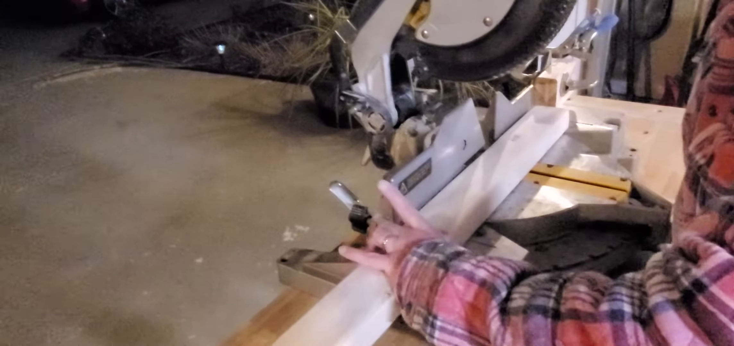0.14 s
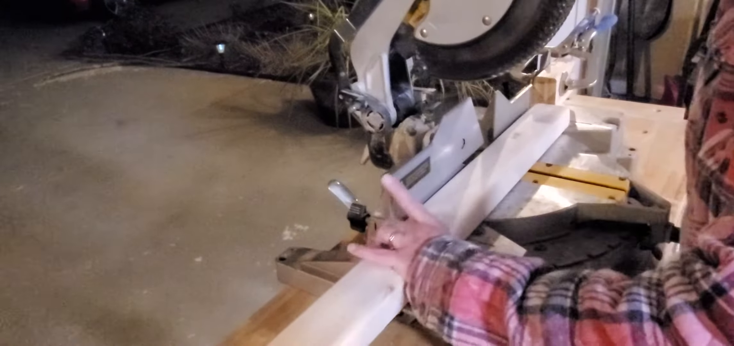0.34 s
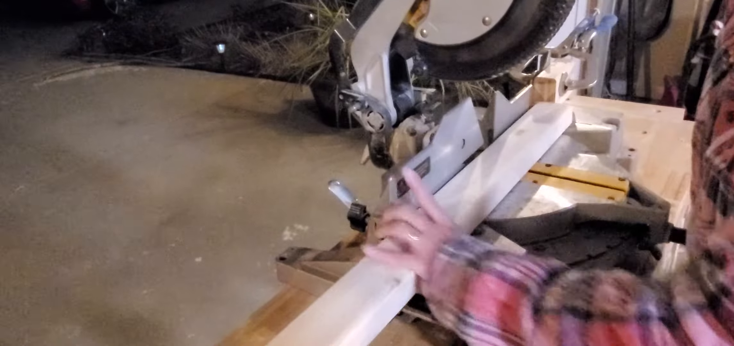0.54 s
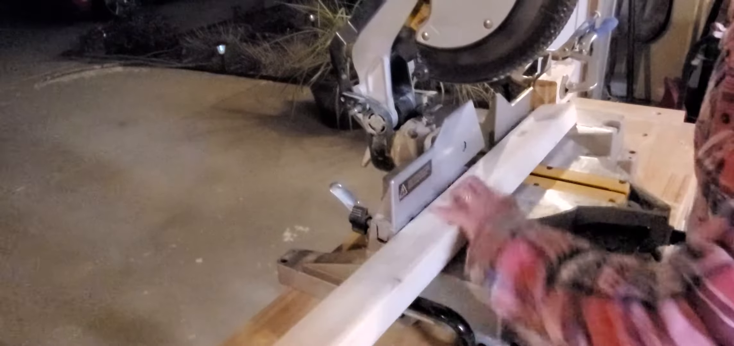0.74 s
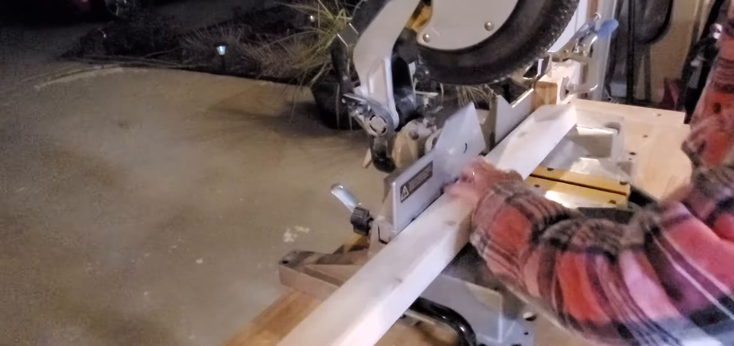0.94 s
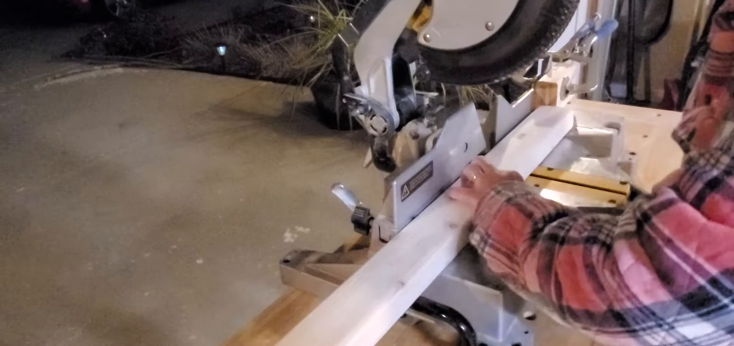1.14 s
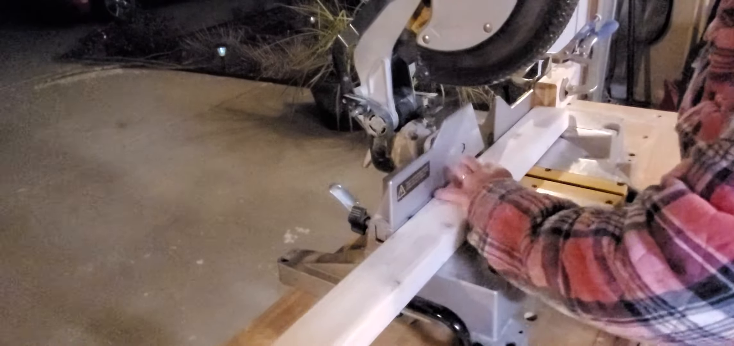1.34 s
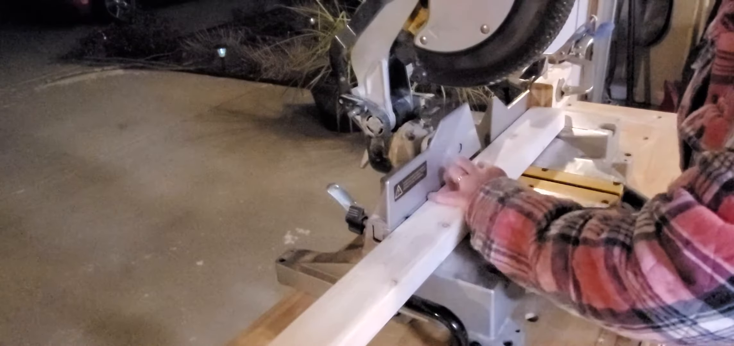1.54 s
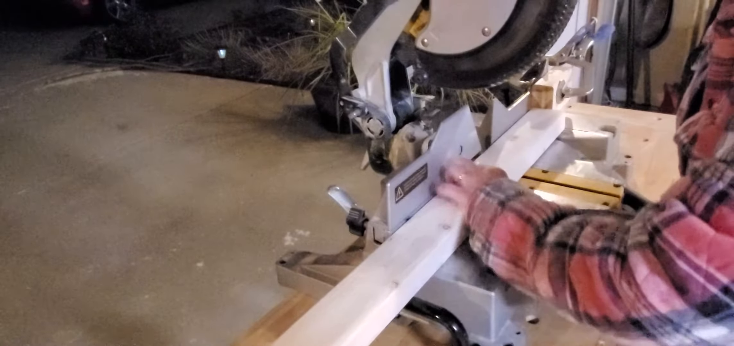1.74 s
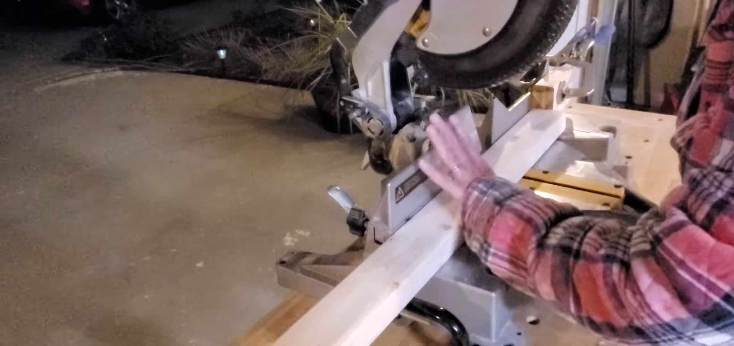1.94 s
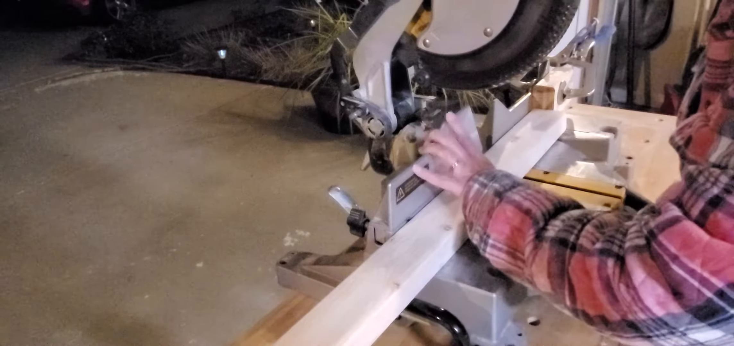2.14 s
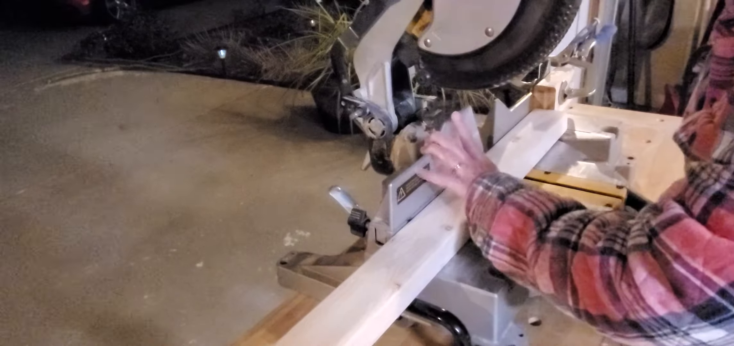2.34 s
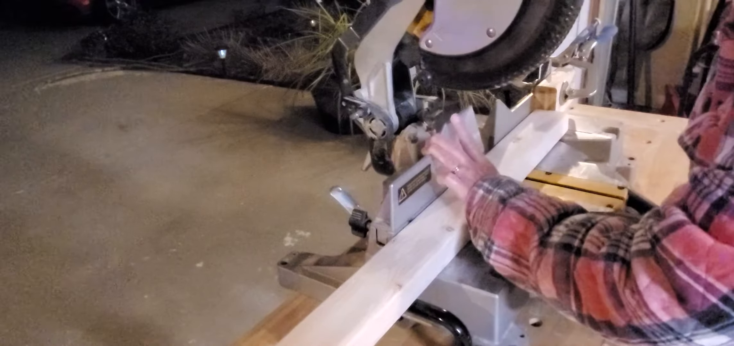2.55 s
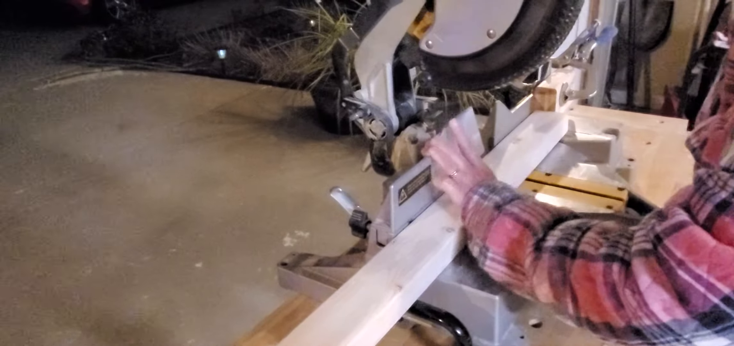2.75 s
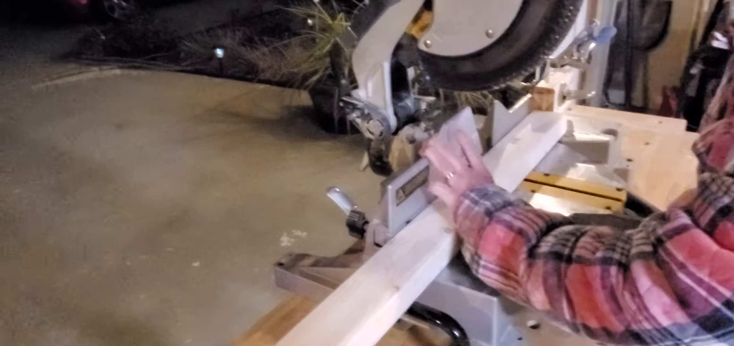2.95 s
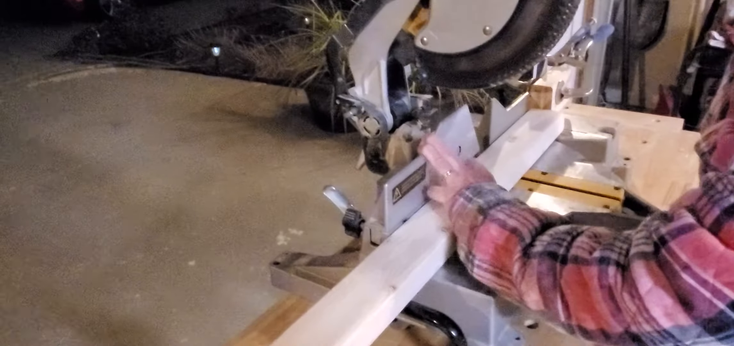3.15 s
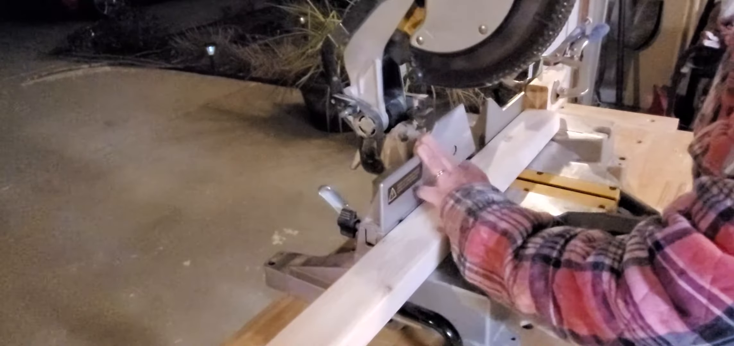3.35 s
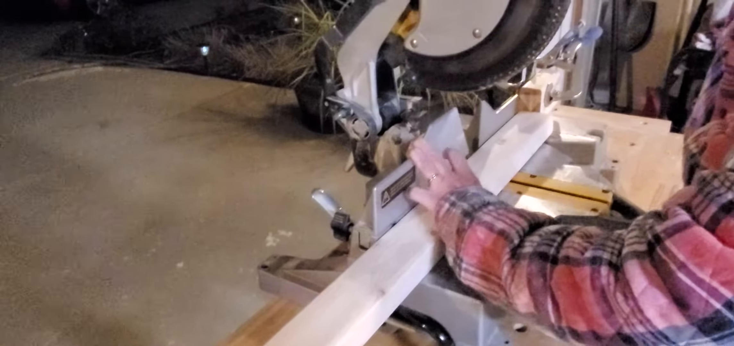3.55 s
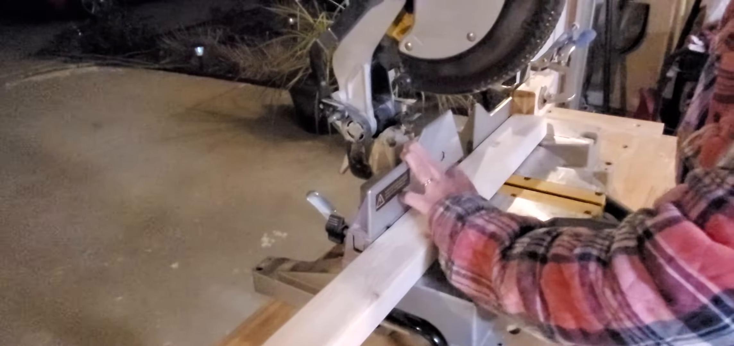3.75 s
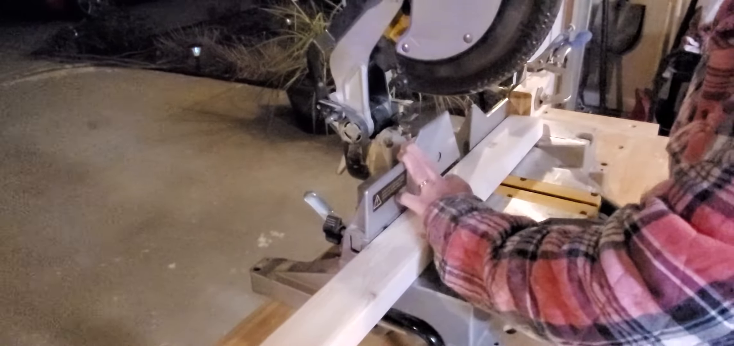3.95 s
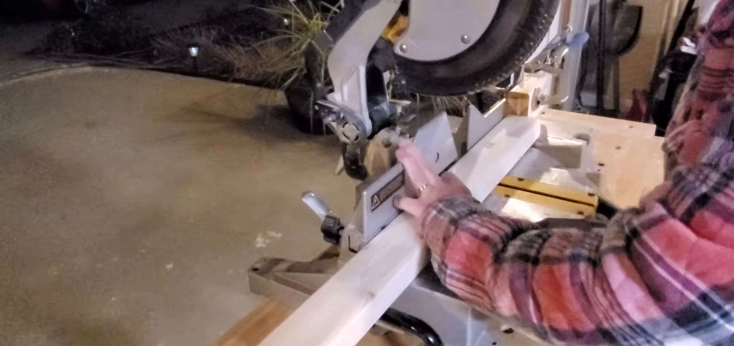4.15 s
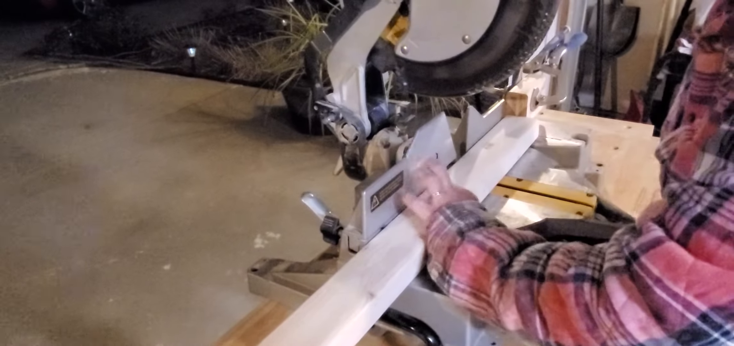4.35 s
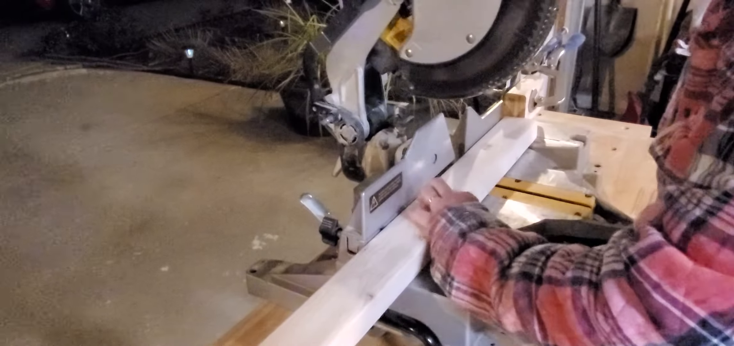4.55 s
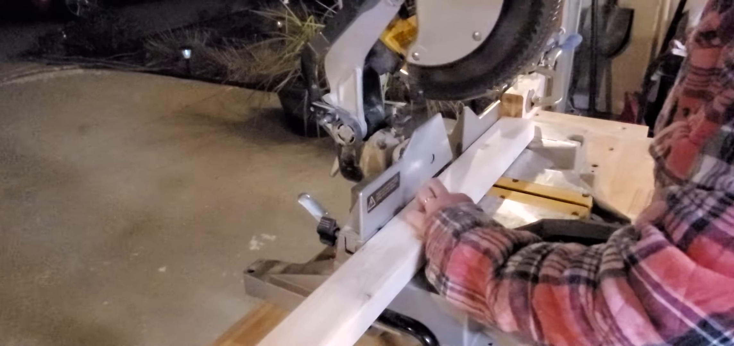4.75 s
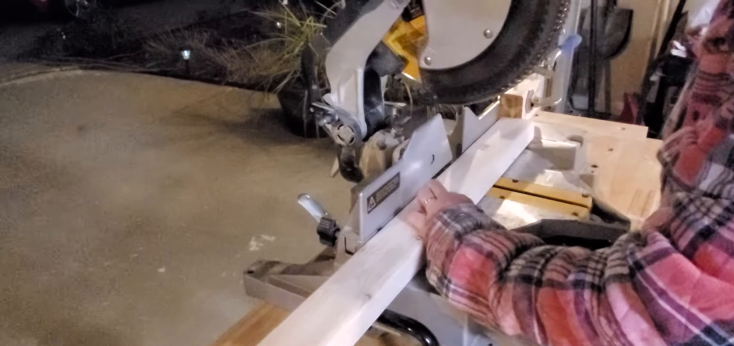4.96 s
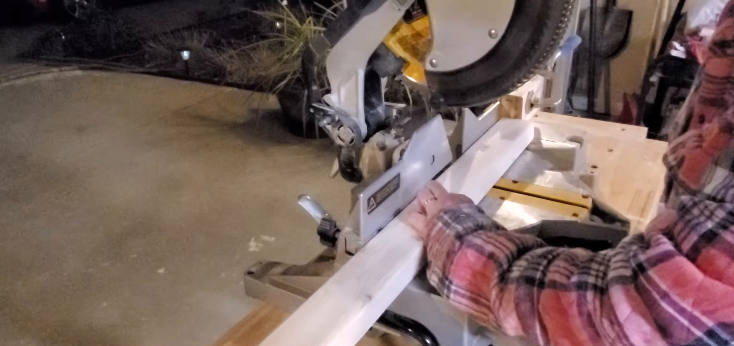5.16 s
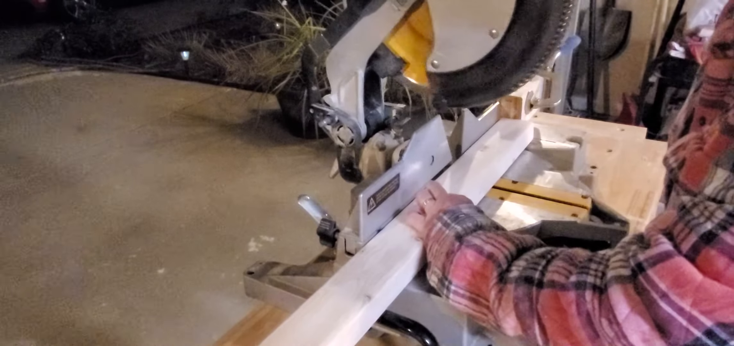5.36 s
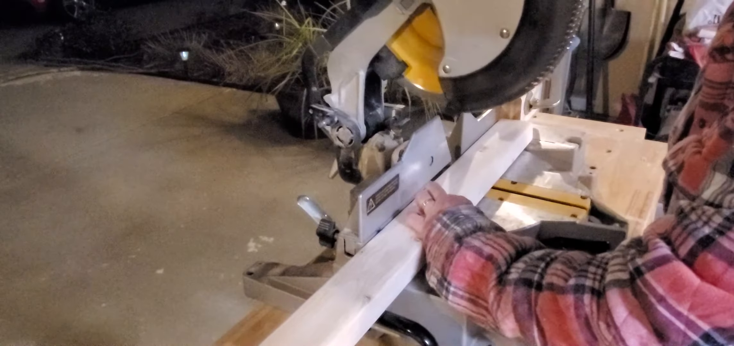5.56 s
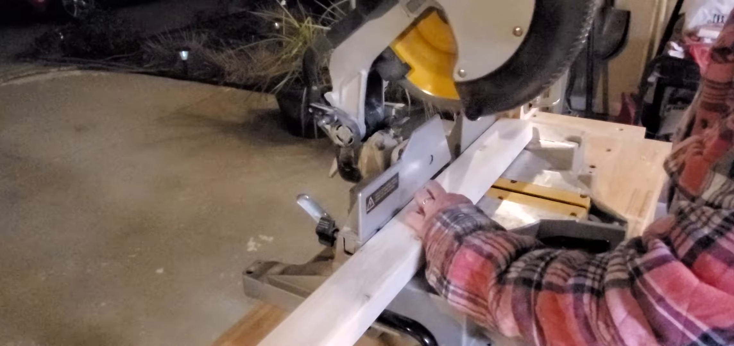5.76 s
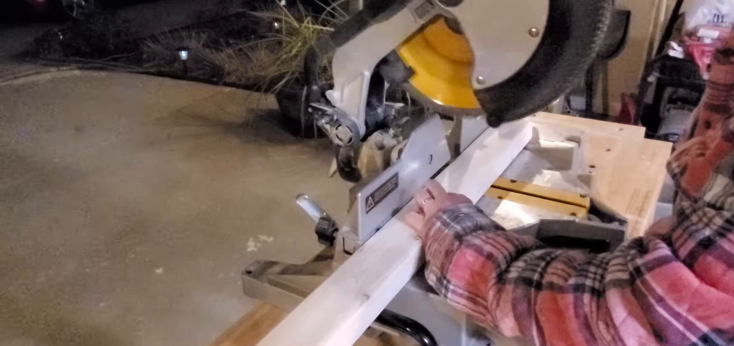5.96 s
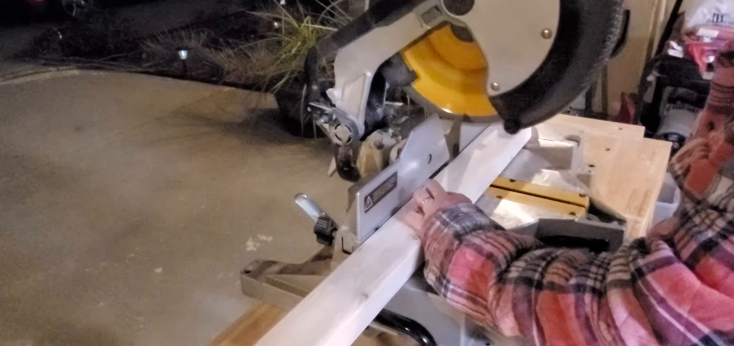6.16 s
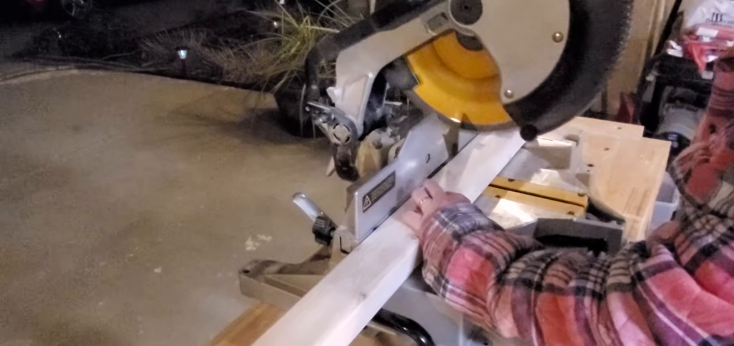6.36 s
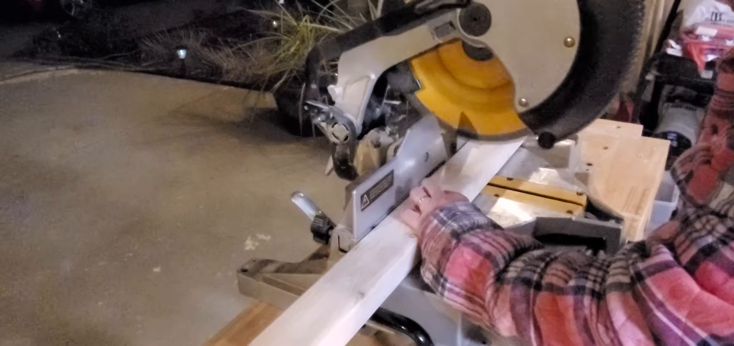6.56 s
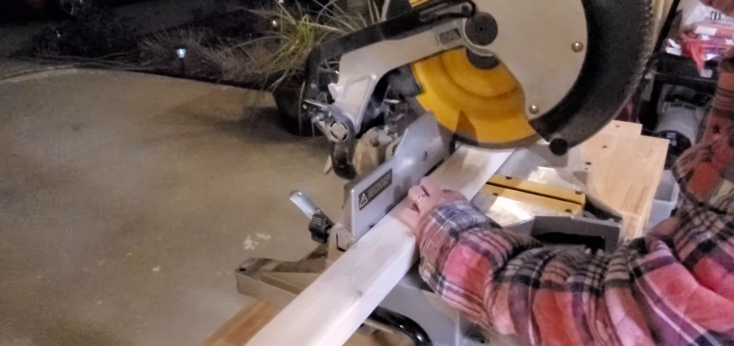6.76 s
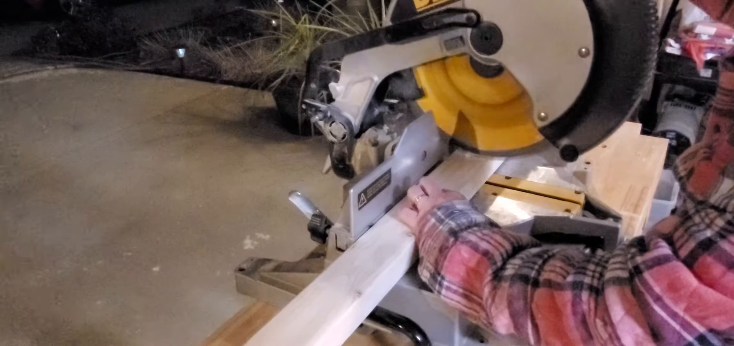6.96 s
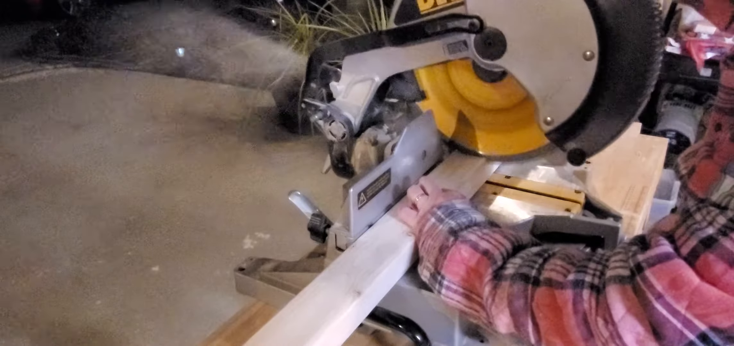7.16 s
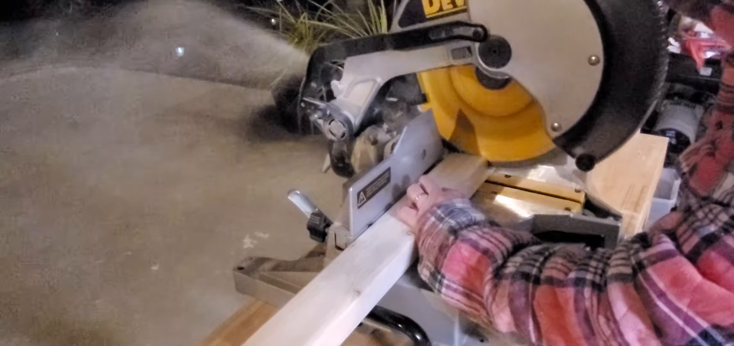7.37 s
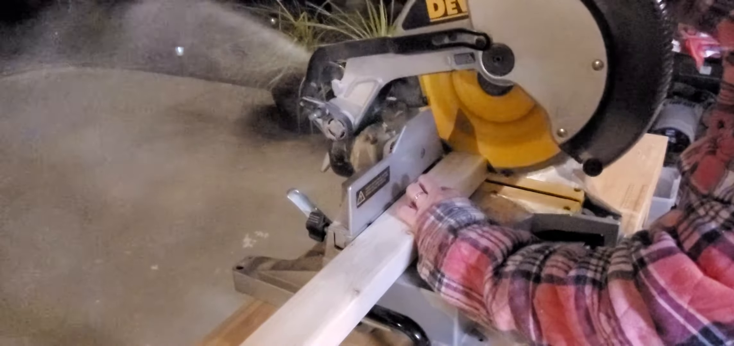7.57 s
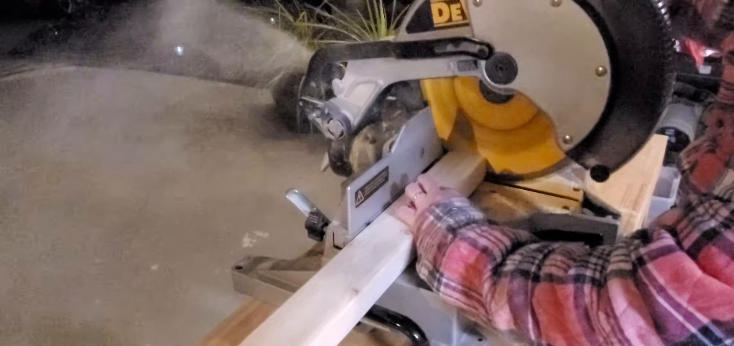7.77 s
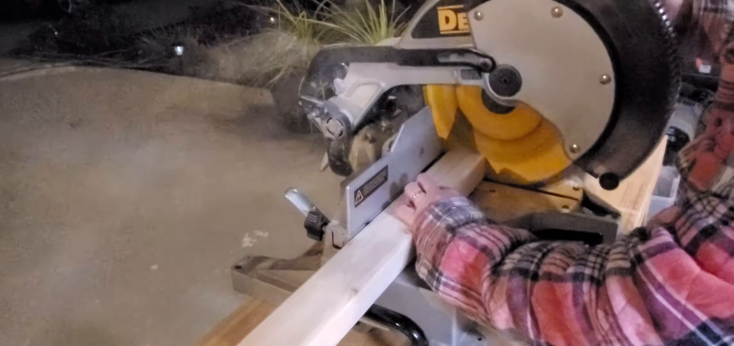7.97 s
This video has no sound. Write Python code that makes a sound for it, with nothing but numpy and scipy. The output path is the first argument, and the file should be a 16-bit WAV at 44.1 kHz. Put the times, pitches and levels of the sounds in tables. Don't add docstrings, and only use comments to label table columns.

```python
import sys
import numpy as np
from scipy import signal
from scipy.fft import rfft, irfft, next_fast_len
from scipy.io import wavfile
from scipy.ndimage import uniform_filter1d

SR = 44100
rng = np.random.default_rng(int(sys.argv[2]) if len(sys.argv) > 2 else 0)


def boost_factor(decibels):
    exponent = np.asarray(decibels, float) / 20
    return 10 ** exponent


def transcribe(u):
    v = np.clip(np.atleast_2d(u).T, -1, 1)
    q = np.round(v * 32767).astype(np.int16)
    wavfile.write(sys.argv[1], SR, q)


N = 354123
T = np.arange(N) / SR
SIZE = next_fast_len(N + SR // 2)
HZ = np.arange(SIZE // 2 + 1) * SR / SIZE + 1e-3

MAINS_HZ = 119
SURGE_S, KICK_S = 5.205, 5.212
LOADED_HZ = 3184
DUCK_S = 6.898


def unit(x):
    return x / np.sqrt(np.mean(x ** 2))


def shape(points):
    hz, values = np.transpose(points)
    return np.interp(np.log(HZ), np.log(hz), values)


def through(x, gain):
    return irfft(rfft(x, SIZE) * gain, SIZE)[..., :N]


def modes(table):
    return sum(boost_factor(db) / (1 + 1j * (HZ - f * f / HZ) / max(w, 3)) for f, w, db in table)


def band(lo_hz, hi_hz):
    return 1 / np.sqrt((1 + (lo_hz / HZ) ** 8) * (1 + (HZ / hi_hz) ** 8))


# frequency in [Hz], share in [0-1].
LIKENESS = [(30, 0.8), (100, 1), (500, 0.98), (1000, 1), (2000, 0.14), (16000, 0)]


def hiss(gain, grit_db=0):
    like = np.clip(shape(LIKENESS), 0, 1)
    grains = rng.standard_normal((2, N)) * boost_factor(grit_db * rng.exponential(size=N))
    mid, side = through(grains, gain * np.sqrt([1 + like, 1 - like]))
    return unit(np.array([mid + side, mid - side]))


def walk(rate):
    k = int(SR / rate)
    held = np.repeat(rng.standard_normal(N // k + 1), k)
    return 1.575 * uniform_filter1d(uniform_filter1d(held, k), k)[:N]


def curves(table):
    s, *columns = np.transpose(table)
    return [np.interp(T, s, c) for c in columns] + [(T >= s[0]) & (T <= s[-1])]


def tone(hz):
    return np.sqrt(2) * np.sin(2 * np.pi * np.cumsum(hz) / SR)


def sing(hz, db, flutter_db, rate):
    both = flutter_db * walk(rate)
    apart = flutter_db / 2 * np.array([walk(rate), walk(rate)])
    return boost_factor(db + both + apart) * tone(hz)


def add(out, s, db, hz, t60, rise_s, skew=0.):
    t = T[:SR // 3]
    fade = np.exp(-np.log(1000) * t / np.clip(t60, .02, .4)) * np.minimum(t / rise_s, 1)
    ring = np.sin(2 * np.pi * hz * t + np.array([[skew], [-skew]]))
    start = int(s * SR)
    out[:, start:start + len(t)] += boost_factor(db) * fade * ring


def strokes(table, peak_share=0.27):
    s, length, *columns = np.transpose(table)[..., None]
    ms = T[::SR // 1000]
    part = np.clip((ms - s) / length, 0, 1) ** (np.log(.5) / np.log(peak_share))
    swell = np.sin(np.pi * part) ** 2
    return [np.interp(T, ms, np.sqrt(np.sum((boost_factor(db) * swell) ** 2, axis=0))) for db in columns]


def room(t60_s=0.075, tail_db=0):
    t = T[:SR // 3]
    fade = np.exp(-np.log(1000) * t / t60_s) * np.minimum(t / 0.0022, 1)
    echoes = rng.standard_normal((2, len(t))) * fade
    tail = boost_factor(tail_db) * band(720, 20000) * rfft(echoes / np.sqrt(np.sum(echoes[0] ** 2)), SIZE)
    return (1 + tail) / np.sqrt(1 + (boost_factor(tail_db) * band(870, 16000)) ** 2)


# frequency in [Hz], level in [dB per Hz].
GARAGE = [(12, -52.5), (20, -27.5), (64, -8), (122, -10), (153, -20.5), (239, -15.5), (334, -22.5),
          (466, -9), (633, -22.5), (791, -17), (1140, -29.5), (1340, -23.5), (2550, -31.5), (2930, -32.5),
          (15600, -44)]
# frequency in [Hz], width in [Hz], level in [dB].
GARAGE_MODES = [(103, 7.1, -3.5), (237, 20, -6), (461, 67, -6)]


def garage():
    standing = 1 + 0.67 * np.abs(modes(GARAGE_MODES))
    return boost_factor(-65) * hiss(boost_factor(shape(GARAGE)) * standing)


# frequency in [Hz], level in [dB per Hz].
CAR_COLOUR = [(59, -78), (100, -44), (200, -23), (237, -4.5), (318, -24), (447, -1.5), (688, -3),
              (1630, -14.5), (2600, -35), (4000, -39.5), (5200, -53), (8800, -120)]


def far_car():
    start_s, swell_s, from_db, full_db = 4.37, 0.31, -55, -42.5
    db = full_db + (from_db - full_db) * np.exp(-np.maximum(T - start_s, 0) / swell_s)
    audible = (T > start_s) * (T < KICK_S + .02)
    return audible * boost_factor(db) * hiss(boost_factor(shape(CAR_COLOUR)))


# frequency in [Hz], level in [dB per Hz].
DUST = [(2350, -12.5), (4000, 3.5), (4510, -2), (6340, 0), (9780, -6), (11500, 3), (13900, -10),
        (15600, -6.5)]


def dust(from_hz, grit_db=0):
    return hiss(boost_factor(shape(DUST)) * band(from_hz, 17000), grit_db)


# frequency in [Hz], level in [dB per Hz].
RUB = [(190, -53.5), (330, -13.5), (495, -0.5), (596, -17.5), (694, -12), (1040, -17.5), (1460, -13),
       (2750, -25), (3000, -21), (4500, -36.5), (5850, -60), (9900, -120)]
# start in [s], length in [s], wood rub in [dB], cloth and dust in [dB].
STROKES = [(-.05, 0.12, -63, -51.5), (.33, 0.34, -63.5, -56.5), (.66, 0.094, -79, -67),
           (.74, .1, -77, -62.5), (.835, 0.17, -70.5, -64), (1.07, 0.18, -58.5, -79),
           (1.295, 0.29, -63, -58), (1.64, 0.12, -72, -65), (1.89, 0.07, -66.5, -60),
           (3.14, 0.27, -87, -67), (4.22, 0.18, -73, -67.5), (4.33, 0.18, -78.5, -72),
           (4.58, 0.18, -82, -70.5)]
# start in [s], length in [s], board boom in [dB], mount rumble in [dB].
SHOVES = [
    (.64, 0.24, -50.5, -58),
    (.72, 0.41, -47.5, -49),
    (1.07, 0.29, -44.5, -58),
    (1.3, 0.35, -51, -62),
    (1.6, 0.4, -64, -88),
    (1.84, 0.4, -67.5, -67),
    (2.16, 0.29, -76.5, -62.5),
    (4.24, 0.5, -62, -80),
    (5.6, 1, -70, -46.5),
]


def slide():
    boom = hiss(modes([(244.0, 38, 9), (197, 38, -23)]))
    rub = boost_factor(2 * walk(60)) * hiss(boost_factor(shape(RUB)) * band(330, 4900), grit_db=3.0)
    grains = boost_factor(2.9 * walk(45)) * dust(4000, grit_db=3.5)
    wood, cloth = strokes(STROKES)
    board, mount = strokes(SHOVES)
    rumble = hiss(band(72, 92))
    return board * boom + boost_factor(18.0) * wood * rub + boost_factor(-3.5) * cloth * grains + mount * rumble


# time in [s], pitch in [Hz], level in [dB].
SQUEAK = [
    [(0.0, 502, -34), (0.044, 510, -38.5), (0.142, 485, -38.5), (0.21, 476, -71)],
    [(0.22, 492, -70), (0.345, 495, -47.5), (0.372, 486, -29), (0.404, 481, -19.5), (0.45, 480.6, -18.5),
     (0.488, 470, -15), (0.506, 499, -30), (0.63, 476, -48.5), (0.668, 474, -68)],
]
# multiple of the pitch [1], level in [dB].
SQUEAK_ORDERS = [(2, 7), (3, -2), (4, -8), (5, -21), (6, -25.5), (7, -18.5)]


def squeak():
    beat_hz, beat_s, beat_depth = 20.3, 0.035, 0.7
    beat = np.abs(1 - beat_depth * np.exp(1j * 2 * np.pi * beat_hz * (T - beat_s)))
    released = np.exp(-(T / 0.085) ** 2)
    out = 0
    for span, twin, drag in zip(SQUEAK, (beat, 1), (released, 1)):
        hz, db, on = curves(span)
        over = 0
        for k, order_db in SQUEAK_ORDERS:
            over = over + boost_factor(order_db + 4.8 * walk(90)) * tone(k * hz * (1 + .01 * walk(90)))
        out = out + on * (boost_factor(db) * twin * tone(hz) + boost_factor(-18 + 1.29 * db) * drag * over)
    return out


# frequency in [Hz], level in [dB].
BOARD = [(662, 6), (775, 1.5), (830, 7), (1090, 2), (1220, -6), (1410, 16.5), (1590, 3), (1790, 11),
         (2060, 6), (2110, 5.5), (2400, -2.5)]
# start in [s], lower modes in [dB], upper modes in [dB].
TAPS = [(0.473, -27, -37.5), (0.67, -45, -62), (0.757, -45, -59), (0.851, -45, -47), (0.919, -60, -59),
        (1.038, -59, -53.5), (1.088, -21, -33.5), (1.104, -20.5, -57), (1.174, -41, -67), (1.237, -45, -58),
        (1.57, -55, -73), (1.61, -37.5, -54.5), (1.634, -37, -63), (1.854, -54, -65), (1.903, -52, -63),
        (2.006, -39.5, -56), (2.173, -48, -59), (2.194, -42.5, -57), (2.389, -64, -73), (2.569, -64, -69),
        (2.82, -49, -62), (2.844, -52, -68), (4.262, -42, -50.5), (4.362, -40.5, -55), (4.476, -55, -61),
        (4.557, -45, -61), (4.637, -55, -61)]


def taps():
    out, crack = np.zeros((2, 2, N + SR))
    chance = rng.standard_normal((len(TAPS), len(BOARD), 4))
    for (s, low_db, high_db), draws in zip(TAPS, chance):
        t60 = 0.064 if s < 1.3 else 0.2
        add(crack, s, high_db + 2.0, 0, 0.96 * t60, .001, np.pi / 2)
        for (hz, db), (a, b, c, d) in zip(BOARD, draws):
            level_db = (low_db if hz < 1300 else high_db) + db + 3 * a - 10.5
            add(out, s + .003 * abs(d), level_db, hz * (1 + 0.0076 * b), 0.64 * t60, .0015, c * hz / 2500)
    wood = hiss(band(450, 2450) ** 3 + boost_factor(-24.0) * band(2460, 5000))
    return out[:, :N] + crack[:, :N] * wood


# start in [s], level
# in [dB], pitch in [Hz].
RINGS = [(0.517, -19, 477), (0.555, -38, 465), (0.675, -34, 392), (0.758, -26.5, 400), (0.834, -34.5, 400),
         (1.091, -28, 411), (1.103, -17.5, 415.5), (1.124, -26.5, 237), (1.384, -46, 545),
         (1.387, -37.5, 237), (1.914, -32.5, 494), (2.244, -45, 88), (2.309, -42, 59), (2.424, -46.5, 49),
         (3.822, -64.5, 235), (4.381, -40.5, 412), (4.508, -37, 254), (4.535, -40, 243),
         (5.257, -14.5, 2808)]
# start in [s], level in [dB], pitch in [Hz].
PINGS = [(0.474, -31, 980), (0.475, -37, 1990), (0.478, -52, 2350), (0.52, -51, 940), (0.57, -51, 986),
         (0.53, -51, 1450), (0.85, -44, 820), (0.85, -45, 1440), (1.61, -47, 1130), (1.612, -50, 2370),
         (1.902, -51, 1156), (1.908, -56, 3000), (1.908, -60, 2220), (2.012, -50, 953), (2.012, -52, 1550),
         (2.03, -50, 848), (2.177, -49.5, 2390), (2.184, -46, 2080), (2.19, -45, 1597), (2.191, -50, 940),
         (2.215, -47, 856), (2.39, -64, 3000), (3.246, -53, 2250), (3.25, -60, 510), (2.573, -65, 1120),
         (2.82, -53, 1580), (2.845, -49.5, 659), (2.846, -54, 2400), (2.851, -46, 2090), (4.261, -46, 2045),
         (4.261, -47, 2420), (4.261, -48, 4550), (4.263, -60, 3200), (4.305, -64, 3250), (4.364, -44, 1470),
         (4.381, -55, 5230), (4.448, -65, 2440), (4.5, -44, 1420), (4.505, -52, 2440), (4.506, -57, 3200),
         (4.56, -54, 2440), (4.637, -59, 2100), (4.637, -56, 2900), (4.638, -54, 4140), (4.658, -61, 4220)]


def rings():
    out = np.zeros((2, N + SR))
    for s, db, hz in RINGS:
        t60 = 0.34 if 200 < hz < 240 else .11
        add(out, s - .003, db + 3.0, hz, t60, .007)
    for s, db, hz in PINGS:
        add(out, s, db + 3.5, hz, min(110 / hz, .12), .004, .3)
    return out[:, :N]


# start in [s], ring in [dB], top in [dB].
TICKS = [(0.8486, -27.5, -48.5), (0.9164, -37, -61), (1.0365, -43, -59.5), (1.088, -37, -58),
         (1.109, -37, -49.5), (1.1583, -48, -68), (1.9118, -53, -47), (2.57, -53.5, -67),
         (3.245, -28, -45.5), (3.362, -44.5, -68), (4.26, -51, -63), (4.369, -65, -54), (4.6374, -53, -64)]
# start in [s], level in [dB].
CLANKS = [(5.232, -7.5), (5.2646, -7), (5.334, -14.5), (5.3446, -11.5), (5.4011, -19), (5.4135, -20),
          (5.451, -14.5), (6.983, -9), (7.329, -10.5), (7.4894, -20), (7.513, -25), (7.6986, -17)]
# frequency in [Hz], level in [dB].
GUARD = [(10700, -9), (12600, 2.5), (12800, -9), (13600, -5), (15350, -3), (15500, -7)]


def ticks_and_clanks():
    out, top = np.zeros((2, 2, N + SR))
    for s, db, top_db in TICKS:
        add(out, s, db - 5, 2670, .025, .0006, .8)
        add(top, s, top_db, 0, .05, .0007, np.pi / 2)
    for s, db in CLANKS:
        add(top, s, db - 8.0, 0, .03, .0007, np.pi / 2)
        for hz, mode_db in GUARD:
            add(out, s, db + mode_db - 8.5, hz, .1, .001, hz / 3000)
    return out[:, :N] + top[:, :N] * dust(2500)


def surge():
    attack_s, hold_s, release_s, jolt_t60_s = 0.015, .19, 0.097, 0.33
    s = SURGE_S + np.cumsum([0, attack_s, hold_s, release_s, .05])
    strain = boost_factor(np.interp(T, s, [-24, 0, 0, -22, -60]))
    jolt = strain * boost_factor(-60 * np.maximum(T - s[1], 0) / jolt_t60_s)
    return strain, jolt, T >= SURGE_S


# multiple of twice the mains rate [1], level in [dB].
BUZZ = [(1, -22), (2, -19), (3, -19), (4, 5), (5, -5), (6, -3.5), (7, -2.5), (8, -9.5), (9, -9), (10, -6.5),
        (11, -9)]
# frequency in [Hz], level in [dB per Hz].
RATTLE = [(880, -31), (1500, 4), (1610, -4), (1820, -5), (2070, -8), (2520, -9.5), (2860, -6.5),
          (3010, -10), (4160, -19), (5860, -13), (7930, -17.5), (10600, -9.5), (12000, -15), (13100, -13),
          (15600, -13)]
# frequency in [Hz], level in [dB], decay t60 in [s].
KICK = [(107, -16, 0.23), (459, 1.5, 0.42), (663, -2, 0.28), (1118, -2, 0.62), (1370, 4.5, 0.063),
        (1610, 3, 0.044), (1870, -25.5, 0.44), (2310, -22, 5.0), (3090, -16, 5.0)]


def switch_on():
    strain, jolt, on = surge()
    buzz = 0
    for k, db in BUZZ:
        buzz = buzz + boost_factor(db + 1.1 * walk(25)) * np.sin(2 * np.pi * (k * MAINS_HZ * T + rng.random()))
    throb = 1 + 0.5 * np.sin(2 * np.pi * MAINS_HZ * T)
    rattle = throb * hiss(boost_factor(shape(RATTLE)) * band(1340, 18000), grit_db=0.5)
    shake = np.hypot(boost_factor(-24.5) * strain, boost_factor(-18.5) * jolt)
    t = np.maximum(T - KICK_S, 0)
    kick = 0
    for hz, db, t60 in KICK:
        fade = np.exp(-np.log(1000) * t / np.clip(t60, .03, .2))
        kick = kick + boost_factor(db) * fade * np.sin(2 * np.pi * hz * t)
    kick = boost_factor(-10.5) * np.minimum(t / 0.0019, 1) * kick
    return on * (boost_factor(-17.5) * strain * unit(buzz) + shake * rattle) + kick


def speed():
    free_hz, from_s, run_up_s = 3390, 5.06, .7
    hz = np.clip(free_hz * (1 - np.exp((from_s - T) / run_up_s)), 500, LOADED_HZ)
    return hz, -14.5 * (1 - np.exp(-np.maximum(T - DUCK_S, 0) / 0.31))


def motor_level(turn, db, power, surge_db, jolt_db, duck_share):
    strain, jolt, _ = surge()
    running = boost_factor(db) * turn ** power
    power_sum = running ** 2 + (boost_factor(surge_db) * strain) ** 2 + (boost_factor(jolt_db) * jolt) ** 2
    return boost_factor(duck_share * speed()[1]) * np.sqrt(power_sum)


# frequency in [Hz], level in [dB per Hz].
ROAR = [(24, -59), (40, -37), (108, -20), (193, -16.5), (237, -0.5), (309, -10.5), (391, -1.5), (463, -7.5),
        (503, -2), (658, -2.5), (890, -7), (1120, -6), (1520, -5), (1830, -10), (2200, -5.5), (2860, -29.5),
        (4840, -120)]
# frequency in [Hz], level in [dB per Hz].
FAN = [(1000, -30), (1700, -5), (1870, -39), (2350, -11.5), (2490, -12), (2860, -3), (3020, -4.5),
       (3880, -6), (4990, -4.5), (5320, -8.5), (5780, -7), (7360, -8.5), (8460, -13), (11300, -10),
       (15600, -20.5)]


def motor():
    on = surge()[2]
    hz, _ = speed()
    turn = hz / LOADED_HZ
    roar = (1 + 0.063 * tone(hz / 48)) * hiss(boost_factor(shape(ROAR)) * band(30, 2050))
    turning = np.clip((T - 5.42) / 0.097, .15, 1)
    roar = roar - (1 - turning) * through(roar, band(20, 290))
    duct = 1 + modes([(3270, 210, -8.5), (2405, 210, -4.5)])
    fan = boost_factor(0.84 * walk(11)) * hiss(boost_factor(shape(FAN)) * band(1800, 26000) * duct)
    octave = turning * boost_factor(11.5 + 3.7 * walk(14)) * tone(np.full(N, 2 * MAINS_HZ))
    hum = tone(np.full(N, MAINS_HZ)) + octave
    flow = np.tanh((hz / 2738) ** 2) ** .5
    roar = motor_level(turn, -21.5, 1, -22.5, -12, duck_share=1) * roar
    fan = motor_level(flow, -14, 5, -29, -19, duck_share=1.24) * fan
    hum = motor_level(turn, -54, -1, -61, -35, duck_share=0.5) * hum
    return on * (roar + fan + hum)


# pitch in [Hz], width in [Hz], level in [dB].
HOUSING = [(2050, 160, -36), (2450, 160, -32), (2680, 140, -31), (2900, 130, -23.5), (3150, 130, -23)]
# pitch in [Hz], width in [Hz], level in [dB], reach in whine [Hz].
PANELS = [(1623, 130, -30.5, 340), (2440, 130, -28, 400), (3200, 81, -36, 2300)]


def whine():
    hz, duck_db = speed()

    def near(f, w):
        return 1 / (1 + (2 * (hz - f) / w) ** 6)

    passed = boost_factor(-38.5) ** 2 + sum(boost_factor(db) ** 2 * near(f, w) for f, w, db in HOUSING)
    gripped = np.maximum(T - 7.14, 0)
    db = 10 * np.log10(passed) + .35 * duck_db + np.maximum(-300 * gripped, -30)
    unsteady = .0007 + .07 * np.clip(1 - hz / 2750, 0, .3)
    commutator = sing(hz * (1 + unsteady * walk(150)), db, 1, 25)
    gear_hz = .2195 * hz * (1 - .14 * gripped)
    gear_fade_db = -12 * gripped
    load_db = 30 * np.log10(hz / LOADED_HZ) + .7 * duck_db + gear_fade_db - 15 * (hz < 2600)
    bite_db = -60 * np.abs(hz / LOADED_HZ - 1) / .2 + 4 * gear_fade_db
    gear = sing(gear_hz, -33 + load_db, 2.5, 14) + sing(gear_hz / 2, -38 + bite_db, 2, 14)
    panels = 0
    for f, w, panel_db, reach in PANELS:
        panels = panels + boost_factor(panel_db + 2 * duck_db) * near(f, reach) * hiss(modes([(f, w, 0)]) ** 2)
    return (T >= SURGE_S) * (commutator + gear + panels)


# frequency in [Hz], level in [dB per Hz].
TEETH = [(2060, -43), (3500, -17), (3870, -17), (4140, -4.5), (5030, -3.5), (5520, -2.5), (6180, -2),
         (7370, -3.5), (8240, -10.5), (8890, -1.5), (10100, -2.5), (11000, 1.5), (12900, 0), (14800, 2.5),
         (15600, -2.5)]
# frequency in [Hz], width in [Hz], level in [dB].
BLADE = [(9240, 130, -7.5), (9540, 24, -5), (9930, 64, -2), (9700, 56, -4.5), (10620, 46, -5),
         (10700, 120, 0.5), (11000, 65, -5), (11000, 100, -4.5), (12200, 42, -4.5), (12700, 46, -13),
         (13400, 63, -6.5), (13600, 49, 1.5), (15000, 130, -8), (15100, 45, -8), (16100, 190, -6)]
# time in [s], teeth in [dB].
FEED = [
    (6.9, -43.5),
    (6.956, -27),
    (7.0, -16),
    (7.08, -21),
    (7.23, -19),
    (7.34, -15),
    (7.63, -21.5),
    (7.92, -21.5),
    (8.03, -24),
]


def cut():
    db, on = curves(FEED)
    rasp_db = np.minimum(-22.5 - 12 * (T - DUCK_S), db - 1.0)
    chips = hiss(boost_factor(shape(TEETH)) * band(3840, 18000), grit_db=2.5)
    rasp = through(chips, band(2900, 8140))
    song = hiss(modes([(f, min(.4 * w, 25), mode_db / 3) for f, w, mode_db in BLADE]) ** 2)
    teeth = boost_factor(db) * boost_factor(.5 * walk(30)) * (boost_factor(0.5) * (chips - rasp) + boost_factor(-10.0) * song)
    return on * (teeth + boost_factor(rasp_db - 0.5) * unit(rasp))


# frequency in [Hz], left minus right in [dB].
LEAN = [(60, 2.5), (110, -2), (200, -0.5), (380, -0.5), (700, 0.0), (1290, 1.5), (2380, -2.5), (4400, -4),
        (8120, -6.5), (11000, -10), (15000, -4)]


def scene():
    echoing = garage() + far_car() + slide() + squeak() + taps() + rings() + ticks_and_clanks() + switch_on()
    saw = motor() + whine() + cut()
    lean = boost_factor(shape(LEAN) / 2) * np.exp(1j * np.pi * HZ * .0001)
    ports = np.array([lean, 1 / lean])
    return through(echoing, ports * room()) + through(saw, ports)


def low_pass(x):
    return signal.sosfilt(signal.butter(12, 16380, fs=SR, output="sos"), x)


def record(dry):
    rounded = np.tanh(dry ** 3 / 3 + dry)
    cut_top = signal.ellip(12, .3, 80, 15770, fs=SR, output="sos")
    return low_pass(signal.sosfilt(cut_top, rounded))


dry = scene()
out = record(dry)
transcribe(out)
```